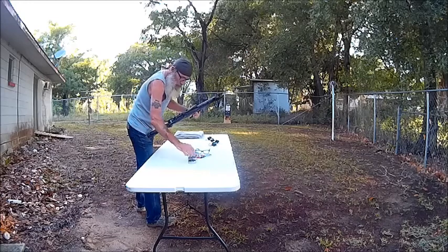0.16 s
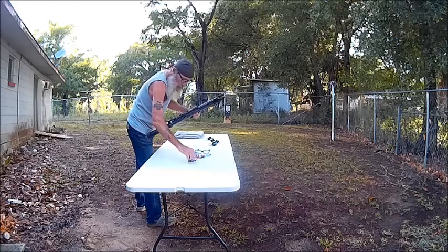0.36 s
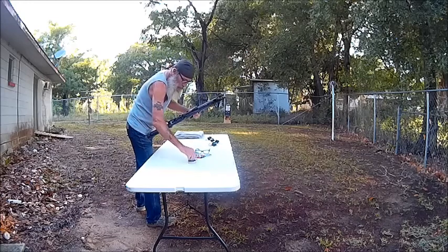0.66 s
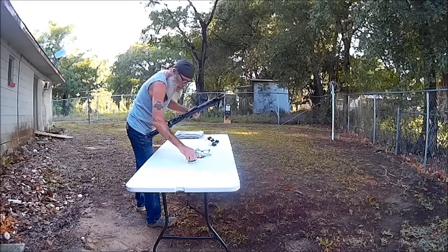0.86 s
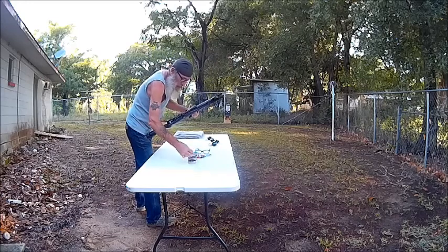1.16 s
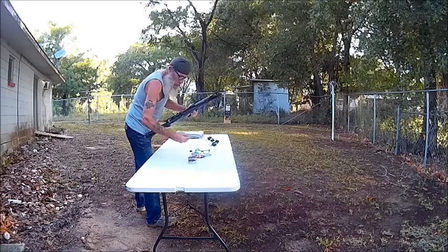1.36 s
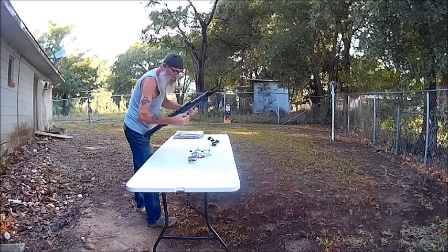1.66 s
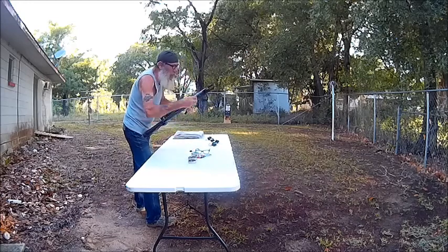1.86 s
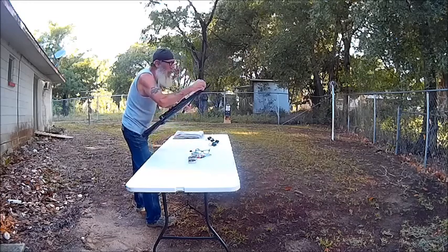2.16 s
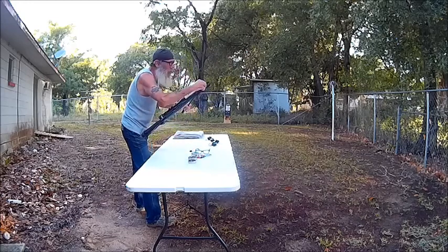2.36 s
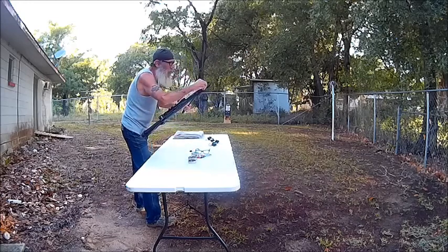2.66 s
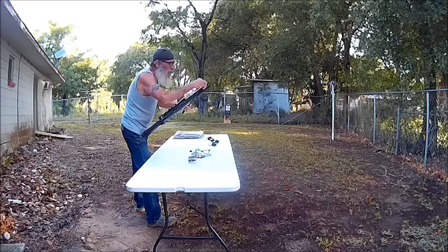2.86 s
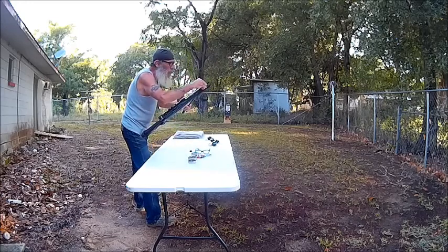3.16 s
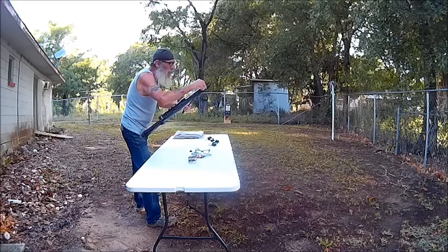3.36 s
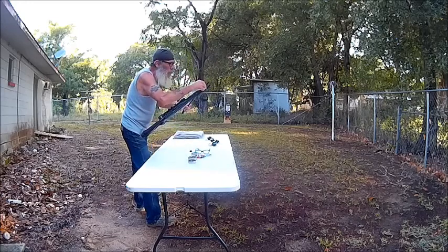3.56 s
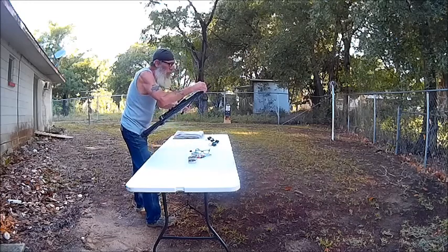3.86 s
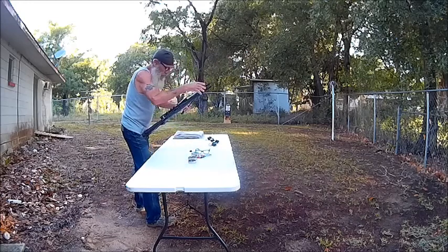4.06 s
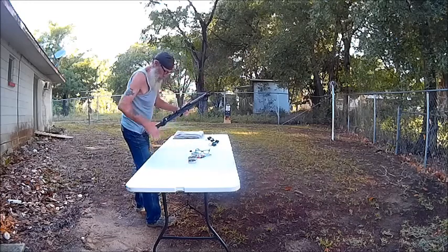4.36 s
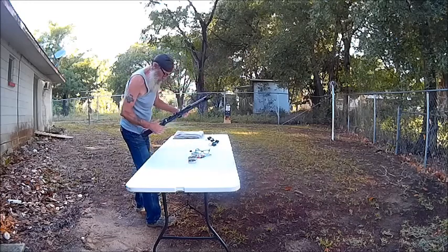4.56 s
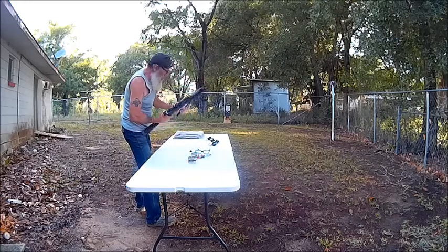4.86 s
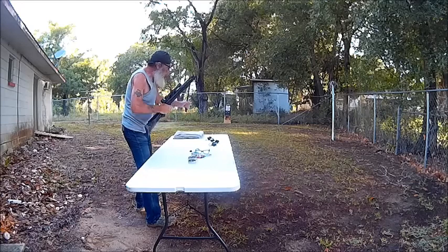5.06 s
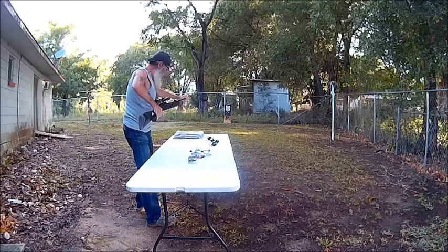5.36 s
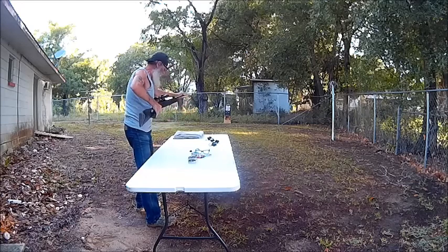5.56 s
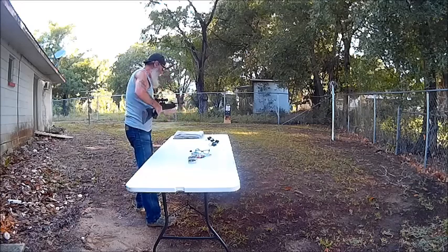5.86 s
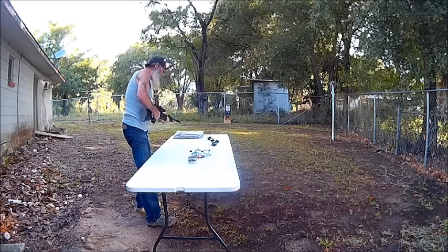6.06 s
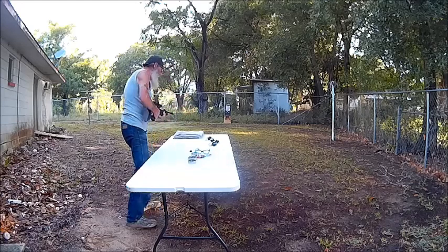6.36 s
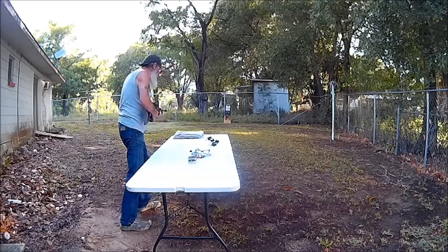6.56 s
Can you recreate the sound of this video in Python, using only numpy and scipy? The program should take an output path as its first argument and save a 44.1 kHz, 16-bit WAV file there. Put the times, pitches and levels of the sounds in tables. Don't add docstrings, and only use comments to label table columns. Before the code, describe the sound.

A backyard cooling unit hums with distant traffic, then a stiff metal barrel swings up and snaps shut with a sharp double clack.

```python
import sys
import numpy as np
from scipy import signal
from scipy.fft import rfft, irfft
from scipy.io import wavfile

SR = 44100
rng = np.random.default_rng(int(sys.argv[2]) if len(sys.argv) > 2 else 0)


def gain_from_db(level_db):
    decades = np.asarray(level_db, float) / 20
    return 10 ** decades


def output_pcm(signal):
    pcm = np.clip(np.atleast_2d(signal).T, -1, 1) * 32767
    wavfile.write(sys.argv[1], SR, np.round(pcm).astype(np.int16))


N = 296386

MOTOR_HZ, FAN_HZ, TRILL_HZ = 109.15, 41.75, 36.33
AIR_DB, RUMBLE_DB, HISS_DB = -47, -48, -63
CLICK_HZ = (1400, 1700)

# time in seconds, level in dB.
LOAD = [(0, 0), (1.1, 0), (2.2, -1), (3.2, -2), (4.3, -2), (5.7, -2), (6.72, 0)]
# centre in seconds, lift in dB, length in seconds.
GUSTS = [(0.117, 4, 0.28), (0.465, 3, 0.16), (0.693, 2.5, 0.29), (.88, 2, 0.51), (1.11, 0.5, 0.1),
         (1.414, 3, 0.4), (1.875, 3.5, 0.17), (2.25, 0.4, 0.33), (2.493, 2, 0.23), (2.75, -0.5, 0.13),
         (2.924, 3, 0.097), (3.08, 2, 0.096), (3.654, 3.5, .15), (3.8, 3, 0.14), (3.97, 4, 0.23),
         (4.164, 2, 0.078), (4.477, 3, 0.088), (4.72, 3, 0.52), (5.48, 5, 0.16), (5.6, 2.5, .1),
         (5.873, 2.5, 0.29), (6.31, 3, 0.28), (6.699, 5, .15)]
# frequency in Hz, density in dB per Hz.
AIRFLOW = [(250, -11), (450, -12.5), (700, -11.5), (1020, -8.5), (1230, -6.5), (1290, -5), (1560, 0),
           (1705, -5), (1740, -8), (2080, -21.5), (2400, -16), (2700, -21), (3150, -32.5), (5000, -37),
           (8000, -60)]
# multiple of the motor speed, level in dB.
MOTOR = [(3, -68), (6, -73), (10, -67), (12, -59.5), (13, -60), (14, -51.5), (15, -57), (16, -68.5),
         (17, -77), (21, -76.5)]
# multiple of the fan speed, level in dB.
FAN = [(3, -58), (5, -51.5), (8, -71), (10, -69), (12, -92)]
# time in seconds, level of the loudest fan tone in dB.
FAN_LEVEL = [(0, -48), (.5, -47), (1.2, -49.5), (1.7, -52), (2.4, -50.5), (3.3, -53), (3.9, -50.5),
             (4.4, -55), (5.3, -50), (5.7, -56), (6.0, -54), (6.72, -53.5)]
# frequency in Hz, width in Hz, level in dB.
PANELS = [(40.7, 15, -62), (63, 5.1, -55), (83.9, 2.7, -63.5), (105.5, 5.9, -57.5), (127.6, 3.6, -59),
          (170.4, 6, -57), (262, 2.8, -69.5), (290.3, 11.5, -69.5), (583, 7.7, -75.5), (593, 9.2, -70.5),
          (677.3, 6.9, -66), (1276, 4.8, -61.5), (1387, 7.3, -58.5), (1455, 13, -62), (1626, 2.5, -56),
          (1700, 42, -58.5), (2260, 6, -90), (2340, 5.5, -70)]
# frequency in Hz, density in dB per Hz.
RUMBLE = [(12, -36), (20, 0), (70, 5.5), (161, 2.5), (201, -2), (225, -4.5), (256, -2.5), (281, -4.5),
          (532, -14), (676, -10.5), (900, -14.5), (1170, -33), (1980, -120)]
# time in seconds, level in dB.
TYRES = [(0, 1), (.3, -2.5), (1, -1.5), (1.5, -2.5), (2.7, 0), (3.4, -1.5), (3.9, 2.5), (4.4, -0.5),
         (5, 2.5), (5.8, 0.5), (6.72, 2)]
# centre in seconds, lift in dB, length in seconds.
PASSES = [(.28, -0.5, 0.28), (.75, 2, .2), (1.1, 5.5, .2), (1.4, 7, 0.24), (2.34, 3.5, 0.32),
          (3.82, 5, 0.3), (4.62, 3.5, .2), (5.33, 6, .3), (6.5, 6, 0.28)]
# frequency in Hz, density in dB per Hz.
HISS = [(1470, -44), (2500, -3), (2850, -11.5), (3220, -12.5), (8250, -15.5), (9680, -16.5), (10100, -16.5),
        (14200, -16.5), (14900, -17.5), (15600, -29)]
# start in seconds, length in seconds, first pitch in Hz, last pitch in Hz, level in dB.
CHIRPS = [
    (.35, .12, 2430, 2890, -61),
    (.51, .05, 2800, 2880, -64),
    (.93, .11, 2520, 2890, -60),
]
# start in seconds, peak in dB, length in ms, bottom and top in Hz.
TICKS = [
    (.631, -39, 12, 1700, 2950),
    (.66, -45, 21, 1800, 3220),
    (5.106, -46, 8, 2400, 5460),
    (5.3045, -36, 3.7, 11000, 15300),
    (6.435, -48, 32, 1900, 4800),
    (6.668, -37.5, 5.1, 2400, 9400),
    (6.669, -37.5, 11, 1802, 3600),
]
# time in seconds, cycle rate in Hz, fifth harmonic level in dB.
ENGINE = [(4.2, 20.4, -56), (4.59, 23.54, -49.5), (4.72, 25.76, -50), (5.15, 29.1, -59.5),
          (5.38, 30.15, -50), (5.7, 30.1, -50.5), (6.19, 30.57, -48), (6.33, 29.7, -47.5),
          (6.72, 30.76, -51.5)]
# time in seconds, level in dB, housing ring in Hz.
SWING = [
    (5.03, -56, 1490),
    (5.1, -48, 1450),
    (5.112, -37.5, 1400),
    (5.14, -37.5, 1380),
    (5.185, -34, 1260),
    (5.2, -34, 1550),
    (5.225, -31, 1610),
    (5.25, -34.5, 1460),
    (5.314, -40, 1410),
]
# start in seconds, peak in dB, steel rings relative dB, latch rings relative dB.
CLICKS = [
    (5.0694, -51.5, 10, -3),
    (5.26, -40, 13, 3),
    (5.2868, -31, -2, -13),
    (5.3045, -29.5, 3, -3),
]
# start in seconds, peak in dB, main ring in Hz, second ring in Hz, brightness in dB.
KNOCKS = [(5.131, -27, 1280, 1480, -24), (5.1426, -24, 1350, 1530, -22), (5.1546, -20.5, 1330, 1440, -26),
          (5.172, -35, 1270, 1510, -20), (5.182, -32, 1210, 1480, -15), (5.2086, -22, 1420, 1720, -15),
          (5.2165, -21.5, 1480, 1730, -11), (5.2235, -23, 1620, 1480, -16), (5.2305, -22, 1390, 1700, -18),
          (5.26, -10, 1660, 1214, -10.5), (5.266, -21, 1720, 1580, -16), (5.2725, -20.5, 1190, 1300, -13),
          (5.3162, -4, 1080, 1593, -18), (5.3252, -14, 1146, 1390, -11.5), (5.3327, -16.5, 885, 1200, -20),
          (5.3440, -22, 1120, 1480, -5), (5.3525, -25, 1190, 1280, -25), (5.3614, -18, 1110, 1520, -16),
          (5.3715, -21, 1215, 1430, -23)]
# frequency in Hz, width in Hz, level in dB.
STEEL = [(1850, 300, 3), (2520, 530, -1.5), (2890, 340, -8)]
# frequency in Hz, width in Hz, level in dB.
LATCH = [(3980, 440, 2.5), (5200, 780, 4), (6600, 600, 3), (7320, 390, 5.5), (11560, 700, -11)]
# start in seconds, level in dB, ring in Hz, 60 dB decay time in seconds.
THUMPS = [(5.14, -34, 129, 0.41), (5.24, -29.5, 145, 0.24), (5.15, -43, 286, 0.23), (5.2, -41, 252, .15),
          (5.245, -37, 272, 0.21), (5.27, -31, 149, 0.17), (5.316, -43, 102, 0.28), (5.317, -37, 330, 0.16),
          (5.37, -37, 138, .2)]
# time in seconds, level in dB, housing ring in Hz.
RATTLE = [
    (5.314, -38, 1310),
    (5.35, -30, 1270),
    (5.39, -37.5, 1420),
    (5.41, -42, 1520),
    (5.47, -66, 1510),
]


def evened(x):
    return x / np.sqrt(np.mean(x ** 2) + 1e-20)


def add(mix, s, sound):
    part = mix[round(s * SR):][:len(sound)]
    part += sound[:len(part)]


def columns(rows, t):
    s, *rest = np.transpose(rows)
    return [np.interp(t, s, c) for c in rest]


def humps(rows, t):
    return sum(db * np.cos(np.pi * np.clip((t - s) / length, -.5, .5)) ** 2 for s, db, length in rows)


def drift(rate_hz):
    steps = rng.standard_normal(800)
    return np.interp(np.arange(N) / SR * rate_hz, np.arange(800), steps)


def coloured(points):
    f, db = np.transpose(points)
    hz = np.fft.rfftfreq(N, 1 / SR)
    gain = gain_from_db(np.interp(np.log(hz + 1), np.log(f + 1), db))
    return evened(irfft(rfft(rng.standard_normal(N)) * gain, N))


def resonate(x, hz, width):
    turn = np.exp(2j * np.pi * np.cumsum(hz * np.ones(len(x))) / SR)
    r = np.exp(-np.pi * width / SR)
    return 2 * (turn * signal.lfilter([1 - r], [1, -r], x / turn)).real


def rings(x, modes):
    return evened(sum(gain_from_db(db) * resonate(resonate(x, f, w), f, w) for f, w, db in modes))


def tones(hz, table, waver_db):
    turns = np.cumsum(hz * np.ones(N)) / SR
    total = np.zeros(N)
    for k, db in table:
        level = gain_from_db(db + waver_db * drift(8.9)) * np.sqrt(2)
        total += level * np.sin(2 * np.pi * (k * turns + rng.random()))
    return total


def whistles():
    hz = np.fft.rfftfreq(N, 1 / SR)
    power = np.zeros(len(hz))
    for f, width, db in PANELS:
        peak = (1 + ((hz - f) / width) ** 2) ** -2.0
        power += gain_from_db(2 * db) * peak / peak.mean()
    return irfft(rfft(rng.standard_normal(N)) * np.sqrt(power), N)


def cooling_unit():
    t = np.arange(N) / SR
    gust_db = humps(GUSTS, t)
    level_db = columns(LOAD, t)[0] + gust_db
    swell_db = level_db - level_db.mean() + 0.97 * drift(18)

    air = coloured(AIRFLOW) * (1 + 0.17 * np.cos(2 * np.pi * MOTOR_HZ * t))
    treble = signal.sosfiltfilt(signal.butter(4, 2050, "high", fs=SR, output="sos"), air)
    air = air + treble * (gain_from_db(-0.5 * (gust_db - gust_db.mean())) - 1)

    motor = tones(MOTOR_HZ * (1 + 0.001128 * drift(3.076)), MOTOR, waver_db=0) * gain_from_db(1.93 * drift(10))
    fan_db = columns(FAN_LEVEL, t)[0]
    fan = tones(FAN_HZ * (1 + 0.0021 * drift(2.564)), FAN, waver_db=0.94)
    fan = fan * gain_from_db(fan_db - fan_db.mean() + 1.5 * drift(6))

    drone = gain_from_db(AIR_DB + 1.05 * swell_db) * air + gain_from_db(0.51 * swell_db) * whistles()
    return drone + gain_from_db(1.2 * swell_db) * motor + fan, swell_db


def traffic(swell_db):
    t = np.arange(N) / SR
    wash = coloured(RUMBLE)
    deep = signal.sosfiltfilt(signal.butter(2, 190, fs=SR, output="sos"), wash)
    deep_db = humps(PASSES, t) - 1.5 + 1.4 * drift(4.45)
    upper_db = columns(TYRES, t)[0] + 0.75 * drift(4.5) + 0.41 * swell_db
    return gain_from_db(RUMBLE_DB) * (gain_from_db(deep_db) * deep + gain_from_db(upper_db) * (wash - deep))


def cricket():
    since = np.cumsum(1 + .0007 * drift(4)) / SR % (1 / TRILL_HZ)
    note = np.sin(2 * np.pi * 9480 * since) + .9 * np.sin(2 * np.pi * 9560 * since)
    stroke = np.sin(np.pi * np.clip(since / .017, 0, 1)) * note
    haze = evened(resonate(rng.standard_normal(N), 9460, 200))
    return gain_from_db(-79.5 + 1.3 * drift(5)) * evened(stroke) + gain_from_db(-83) * haze


def capsule_hiss(swell_db):
    return gain_from_db(HISS_DB + .5 * swell_db + 0.44 * drift(25)) * coloured(HISS)


def chirp(length, from_hz, to_hz, db):
    hz = np.linspace(from_hz, to_hz, round(length * SR))
    voice = 1.3 * np.cos(2 * np.pi * np.cumsum(hz) / SR) + 7 * rng.standard_normal(len(hz))
    return gain_from_db(db) * evened(resonate(voice, hz, 60)) * np.hanning(len(hz)) ** .4


def yard(x):
    taps = np.zeros(SR // 3)
    at = np.arange(300, len(taps) - 20, 20)
    taps[at + rng.integers(0, 20, len(at))] = rng.choice([-1., 1.], len(at))
    taps *= gain_from_db(-60 * np.arange(len(taps)) / SR / 0.24)
    taps = signal.lfilter([1], [1, -.6], taps)
    return signal.fftconvolve(x, taps / np.linalg.norm(taps))[:N]


def tick(db, length_ms, low_hz, top_hz):
    ms = np.arange(3000) / SR * 1000
    band = signal.butter(3, [low_hz, top_hz], "band", fs=SR, output="sos")
    grit = signal.sosfilt(band, rng.standard_normal(len(ms)))
    grit = evened(signal.lfilter([1], [1, -.7], grit))
    age = ms / length_ms
    fall_db = 4 * age + 20 * np.maximum(age - 1, 0)
    return gain_from_db(db - 9.5 - fall_db) * grit * np.clip(ms / 1.3, 0, 1)


def far_engine():
    t = np.arange(N) / SR
    hz, level_db = columns(ENGINE, t)
    turns = 2 * np.pi * np.cumsum(hz) / SR
    sound = gain_from_db(-2 + 2.2 * drift(9)) * np.sin(3 * turns) + np.sin(5 * turns) + gain_from_db(-13) * np.sin(10 * turns)
    fade_in = np.clip((t - ENGINE[0][0]) / 0.2, 0, 1)
    return np.sqrt(2) * sound * gain_from_db(level_db + 1.2 * drift(7.9)) * fade_in


def pivot(course, bite_db, colour_db):
    t = np.arange(course[0][0], course[-1][0], 1 / SR)
    level_db, hz = columns(course, t)
    bright_db = colour_db + bite_db * np.exp(-(t - t[0]) / 0.03)
    size_db = 2.5 * np.minimum(rng.exponential(1, len(t)), 3)
    slips = rng.standard_normal(len(t)) * gain_from_db(size_db) * (rng.random(len(t)) < 4000 / SR)

    body = evened(resonate(resonate(slips, hz, 340), hz, 340))
    body = body + gain_from_db(-7) * rings(slips, [(650, 170, -3), (360, 430, -9), (925, 370, -6.5)])
    mid = rings(slips, [(2600, 200, 6), (2090, 250, 2.5), (3230, 1300, -16)])
    scrape = evened(slips) + 1.6 * rng.standard_normal(len(t))
    broad = rings(scrape, [(4150, 2100, 3), (7000, 3500, -13)])
    sound = body + gain_from_db(bright_db - 10.5) * mid + gain_from_db(bright_db - 24) * broad
    return t[0], gain_from_db(level_db) * sound


def knock(db, low_hz, high_hz, mid_db, treble_db):
    ms = np.arange(1300) / SR * 1000
    rise = np.sin(np.pi / 2 * np.clip(ms / .7, 0, 1)) ** 2
    shape = rise * gain_from_db(-7 * np.maximum(ms - 5.6, 0) - 0.6 * ms)
    low, high = 2 * np.pi * np.outer([low_hz, high_hz], ms) / 1000
    body = np.sin(low) - 0.63 * np.sin(high + 2.2)
    body += 0.48 * np.sin(0.443 * low + 0.552 * high + 0.51)
    body += 0.22 * np.sin(0.462 * low) + 0.2 * np.sin(0.617 * low)
    chatter = rng.standard_normal(len(ms))
    upper = gain_from_db(mid_db) * rings(chatter, STEEL) + gain_from_db(treble_db) * rings(chatter, LATCH)
    return gain_from_db(db - 6) * shape * (body + upper * gain_from_db(-.7 * ms + 5.5))


def latch_click(db, mid_db, treble_db):
    return knock(db, *CLICK_HZ, mid_db, treble_db)


def steel_knock(db, low_hz, high_hz, bright_db):
    return knock(db, low_hz, high_hz, bright_db, -27 + 0.28 * bright_db)


def thump(db, hz, t60):
    t = np.arange(9000) / SR
    return gain_from_db(db - 60 * t / np.clip(t60, .05, .4)) * np.sin(2 * np.pi * hz * t) * np.clip(t / 0.0079, 0, 1)


def scene():
    near = np.zeros(N)
    events = ((CHIRPS, chirp), (TICKS, tick), (CLICKS, latch_click), (KNOCKS, steel_knock), (THUMPS, thump))
    for table, source in events:
        for s, *row in table:
            add(near, s, source(*row))
    add(near, *pivot(SWING, bite_db=14, colour_db=0))
    add(near, *pivot(RATTLE, bite_db=0, colour_db=-1.5))
    drone, swell_db = cooling_unit()
    background = drone + traffic(swell_db) + cricket() + capsule_hiss(swell_db) + far_engine()
    return (near + gain_from_db(-14) * yard(near) + background)[None]


def top_cut(x):
    return signal.sosfilt(signal.butter(12, 15710, fs=SR, output="sos"), x)


def record(dry):
    mix = signal.oaconvolve(dry, signal.firwin(401, 15700, fs=SR)[None], "same")
    return top_cut(mix)


dry = scene()
out = record(dry)
output_pcm(out)
```